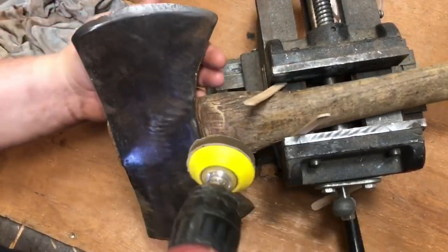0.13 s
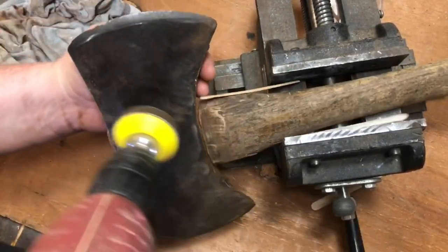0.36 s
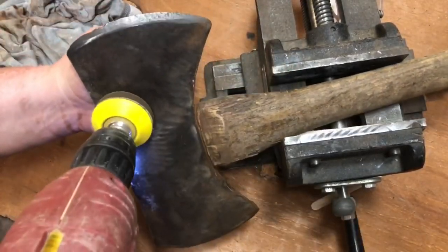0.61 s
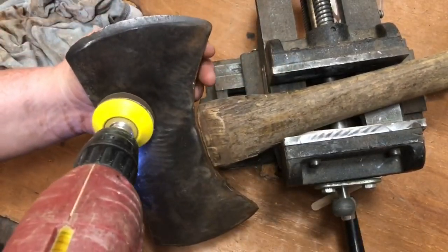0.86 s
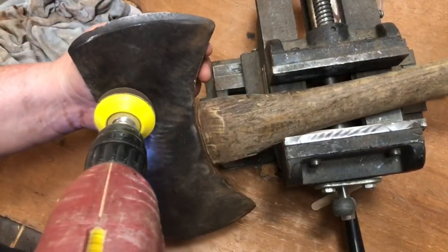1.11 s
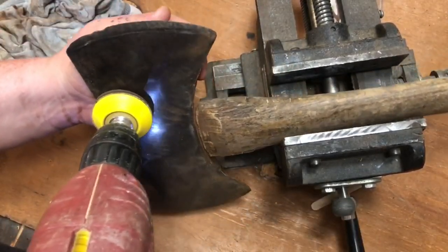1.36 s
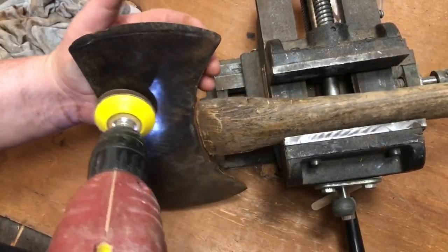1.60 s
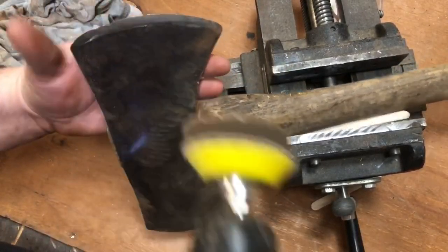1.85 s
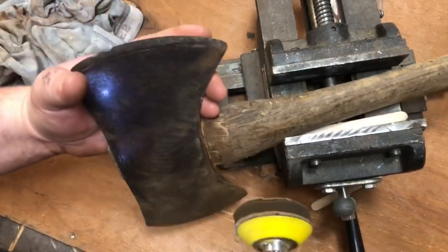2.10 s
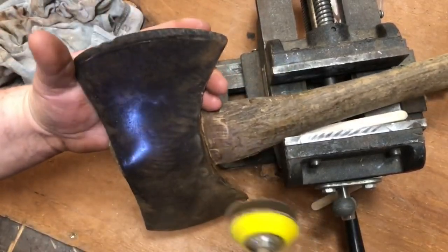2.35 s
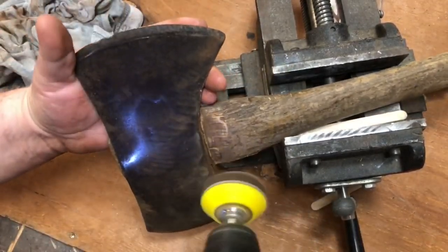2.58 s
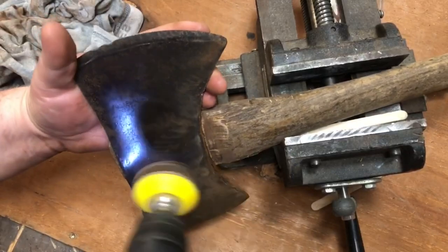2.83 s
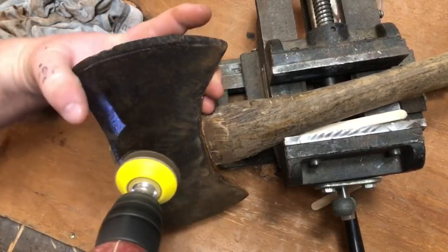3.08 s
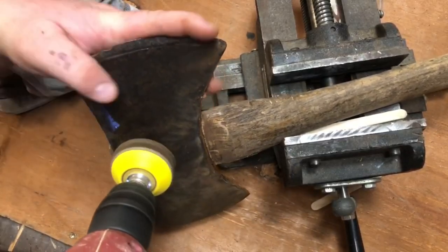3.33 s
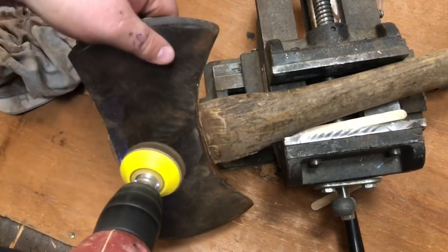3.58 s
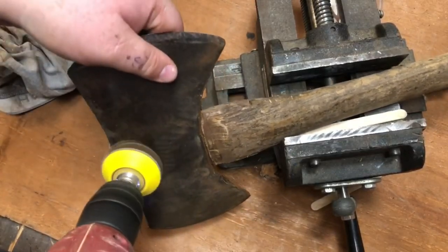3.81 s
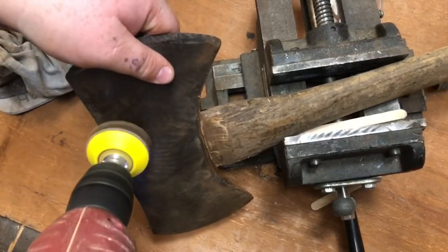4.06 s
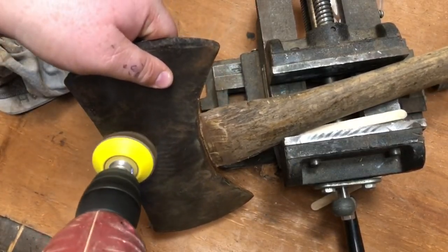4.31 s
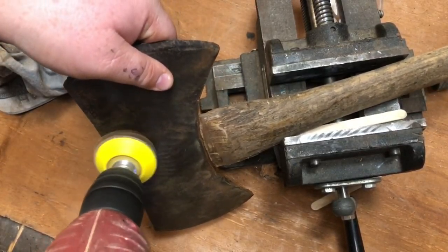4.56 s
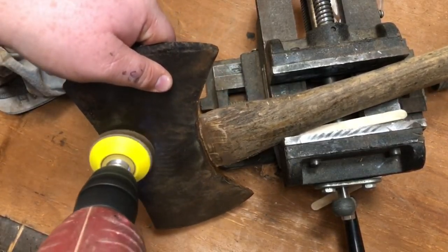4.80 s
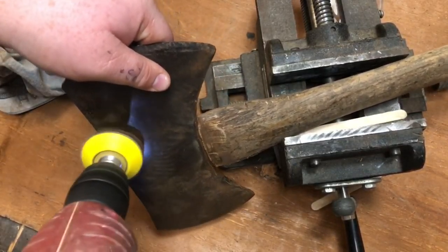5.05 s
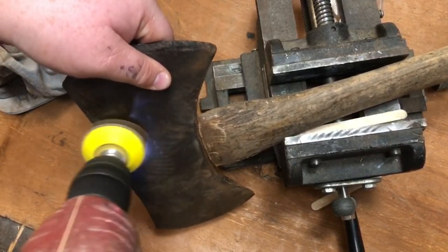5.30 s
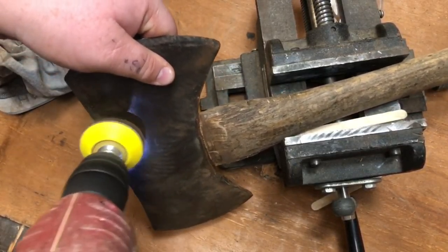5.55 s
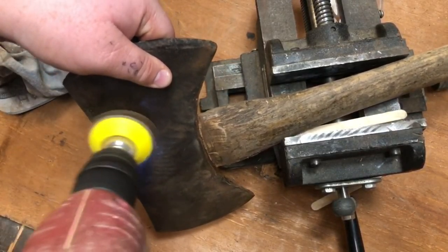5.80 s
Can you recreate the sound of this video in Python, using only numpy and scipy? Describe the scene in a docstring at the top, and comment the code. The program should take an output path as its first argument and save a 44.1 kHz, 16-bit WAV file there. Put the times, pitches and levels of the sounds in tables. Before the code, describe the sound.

Brief metallic clinks and bumps of handling an axe head, then a power drill chatters on and holds a loud, harsh, hissing whir.

```python
"""In a humming workshop, a hand drill starts up and spins a sanding disc beside a steel axe head in a vice.
Before it, hands shift the tool: steel ticks, dull knocks, scrapes, a faint chuck rattle, thuds and rustle.
Struck things are ringing modes with noise cracks; the drill is coloured noise and tones tied to rotor speed.
One close microphone, alike on both channels, hears it; its gain control ducks everything when it gets loud."""
import sys
import numpy as np
from scipy import signal
from scipy.fft import rfft, irfft
from scipy.io import wavfile

SR = 44100
rng = np.random.default_rng(int(sys.argv[2]) if len(sys.argv) > 2 else 0)


def pcm_store(signal):
    """Save signal as 16-bit PCM."""
    levels = np.round(np.clip(np.atleast_2d(signal), -1, 1) * 32767)
    wavfile.write(sys.argv[1], SR, levels.astype(np.int16).T)


def voltage_ratio(decibels):
    """Convert decibels (scalar or array-like) to amplitude ratios, 20 dB per decade."""
    exponent = np.asarray(decibels, float) / 20
    return 10 ** exponent


N = 260631
T = np.arange(N) / SR   # s

# Levels are those ahead of the gain control; colours are only shapes, brought to unit rms before use.
# room air colour: pitch_hz, level_db (per Hz)
AIR_COLOUR = [(15, -52), (25, -22), (70, -9.5), (113, -11.5), (205, 2.5), (254, -8.5), (333, -4.5),
              (380, -6.5), (460, -3), (526, -13), (854, -10), (1390, -16), (3470, -18), (11100, -43.5),
              (15700, -37)]
AIR_DB = -41.5
# machines running nearby: pitch_hz, level_db
HUM_TONES = [(118.4, -48.5), (166.9, -53), (204.6, -60), (333.8, -47), (683.7, -58), (850.6, -59)]
HUM_WIDTH_HZ, HUM_WAVER = 6.0, .35
# skin and cloth moving: start_s, level_db
RUSTLE_LEVEL = [(0.0, -62), (0.16, -55), (0.85, -57.5), (1.3, -69), (1.5, -58), (1.93, -52), (2.08, -63),
                (2.46, -55)]
# rustle colour: pitch_hz, level_db (per Hz)
RUSTLE_COLOUR = [(2000, -15), (3500, -30), (5100, 14.5), (6000, 3.5), (7300, 9.5), (10000, -0.5),
                 (16000, -12)]
ROOM_T60_S, ROOM_DB = 0.18, -24

# pushes carried through the bench: start_s, level_db, pitch_hz
BENCH_THUDS = [(0.529, -17, 403), (0.549, -28, 130), (0.567, -21.5, 230), (1.791, -18, 367),
               (1.81, -25, 375), (1.847, -18, 162), (1.864, -21, 81.4), (2.084, -17.5, 390),
               (2.11, -26, 109), (2.225, -25, 128), (2.42, -31, 75.4), (2.53, -29, 300)]
THUD_T60_CYCLES = 6.28
# wood and plastic knocks: start_s, level_db
HANDLE_KNOCKS = [(0.499, -22.5), (0.696, -31), (0.715, -36), (0.762, -28), (0.774, -26.5), (0.806, -33),
                 (1.039, -32), (1.055, -31.5), (1.647, -30.5), (2.01, -32.5), (2.068, -33), (2.079, -33.5)]
# modes of handle and housing: pitch_hz, level_db, t60_s
HANDLE_MODES = [(995, -7, 0.02), (1530, -11.5, 0.017), (2360, -11, .012), (2950, -5.5, 0.017)]
# something drags briefly over the steel: start_s, length_s, level_db
STEEL_SCRAPES = [(0.393, 0.079, -40), (0.47, 0.031, -44), (0.592, 0.066, -47), (.77, 0.094, -46),
                 (1.243, 0.055, -50), (1.578, 0.1, -51), (1.9, 0.037, -48), (2.04, 0.064, -47)]
# scrape colour: pitch_hz, level_db (per Hz)
SCRAPE_COLOUR = [(1000, -17), (3000, 7), (7500, 0), (11000, -7), (16000, -3)]
# the loose chuck tingles faintly while the drill is swung
RATTLE_FROM_S, RATTLE_TO_S, RATTLE_DB = 1.45, 1.88, -61
# chuck modes: pitch_hz, level_db, t60_s
CHUCK_MODES = [(5150, 0, .04), (6600, -1, .03), (7500, -8, .03), (9000, -9, .03), (11600, -9, .03),
               (13100, -8, .03)]
# steel touching steel: start_s, level_db, favoured pitch_hz, ring level_db (relative to the touch)
STEEL_TICKS = [(.3571, -32, 4470, -6), (.3959, -3.5, 7300, -5), (.4010, -8, 6000, -14),
               (.4105, -12, 4660, -12), (0.426, -24, 3840, -8), (.4678, -23, 5200, -7),
               (.4825, -30, 8500, -12), (0.5894, -11.5, 5900, -16), (.5940, -18, 4460, -2),
               (.6963, -31, 7500, -11), (.7617, -26, 8000, -4), (0.7742, -21, 6860, -4),
               (1.8517, -16, 5000, -12), (1.9011, -16, 6560, -7), (1.903, -10, 6250, -20),
               (2.0620, -26, 13000, -14), (2.072, -18.5, 6960, -15)]
# axe head modes: pitch_hz, level_db, t60_s
AXE_MODES = [(2500, -16, .025), (3750, -9, .06), (4400, -8, .045), (4700, -11, .06), (5200, -9, .025),
             (6100, -13, .02), (6850, -8, .035), (7400, -5, .055), (8100, -10, .025), (9200, -9, .03),
             (10450, -9, .035), (12300, -12, .025), (14000, -11, .02)]
# lighter touches, at random while the hands work
HANDLING_FROM_S, HANDLING_TO_S = .6, 2.3
FAINT_TICKS, FAINT_TICK_DB, FAINT_RING_DB = 8, -40, -11
FAINT_KNOCKS, FAINT_KNOCK_DB, FAINT_SPREAD_DB = 6, -38.5, 1

# Levels of the drill's parts are relative to each other: DRILL_GAIN_DB comes on top of them all.
DRILL_GAIN_DB = 9.5
SWITCH_ON_S, RUN_UP_S = 2.468, .075
# motor speed, runs up free and sags a little once the disc is pressed on: start_s, speed (turns per s)
ROTOR_SPEED = [(2.47, 310), (2.55, 340), (2.7, 372), (2.87, 412), (2.95, 425), (3.06, 437), (3.18, 445.3),
               (3.35, 450.8), (3.6, 454.3), (4.14, 454), (5.1, 446), (5.91, 446.5)]
# the gears take load suddenly; the hiss swells as air and disc come up to speed
ENGAGE_S, ENGAGE_RISE_S, SLACK_DB = 2.5, 0.02, -12
CLATTER_DB, FIRST_EXTRA_DB, SETTLE_S = -20.5, -0.5, 0.13
HISS_DB, HISS_LAG_DB, HISS_SWELL_S = -22, -9.5, 0.079
FADE_DB_PER_S = 0.41   # the battery tires
# gear case colour while running: pitch_hz, level_db (per Hz)
CLATTER_COLOUR = [(88, -56), (150, -49), (242, -20), (303, -22), (441, -14), (1280, -1.5), (1370, -1.5),
                  (2030, -6.5), (2860, -2), (3630, -3.5), (3950, -5), (4690, -6.5), (5380, -8.5),
                  (6070, -11), (9000, -10.5), (11700, -60), (19800, -120)]
# colour of brushes, fan and disc: pitch_hz, level_db (per Hz)
HISS_COLOUR = [(2500, -15), (4500, -2.5), (5350, 5), (6130, -2), (6900, 6), (7470, 3.5), (8300, 6),
               (9550, 6), (10900, 7.5), (12500, 5), (14000, 1), (15000, 5), (15700, 5.5), (17000, -5.5)]
# uneven teeth smear tones into bands: multiple of rotor speed, level_db, width_hz
SMEARED_TONES = [(3, -49.5, 420), (9, -31.5, 360), (12, -35, 260)]
SMEAR_GROWTH = 3   # power of speed
# a lower panel sings while the motor pulls hardest
BITE_HZ, BITE_T60_S, BITE_DB, BITE_S = 3250, .007, -19, .08
# a panel that the gears keep ringing
HOUSING_HZ, HOUSING_T60_S, HOUSING_DB = 3920, 0.019, -31
# teeth taking up their slack, first as single blows: start_s, level_db
SLACK_JOLTS = [(2.4695, -17), (2.4790, -23), (2.4880, -19), (2.5015, -13)]
# then as a quick run
CHATTER_FROM_S, CHATTER_GAP_S, CHATTER_COUNT = 2.511, .0082, 13
CHATTER_DB, CHATTER_FADE_DB_PER_S, CHATTER_SPREAD_DB = -12.5, 22, 2
# gear case colour when jolted: pitch_hz, level_db (per Hz)
JOLT_COLOUR = [(100, -50), (500, -12), (1050, -4), (1600, -1), (2200, -6.5), (3300, -7), (4500, -9.5),
               (6000, -18), (7500, -14), (11500, -24), (16000, -25)]
# what a jolt leaves ringing: pitch_hz, level_db, t60_s
JOLT_MODES = [(1040, -10.5, 0.013), (3190, -10, 0.017), (3530, -15, 0.018)]
# teeth, bars and blades passing: multiple of rotor speed, level_db
WHINE_TONES = [(2, -48), (3, -38), (12, -40), (24, -42), (32, -50), (36, -33)]
SHELL_T60_S, SHELL_DB, SHIFT_HZ = 0.09, -13.5, 3.16

# microphone
DUCK_FROM_DB, DUCK_SLOPE, DUCK_S = -32.5, 0.48, 0.12
CUTOFF_HZ, RUMBLE_CUT_HZ = 15750, 46


def rms_one(x):
    """Scale to unit rms."""
    return x / np.sqrt(np.mean(x ** 2) + 1e-20)


def in_time(rows):
    """A table of times and values, read at every sample."""
    s, value = np.transpose(rows)
    return np.interp(T, s, value)


def coloured(x, spectrum):
    """Give a white signal a spectrum in dB per Hz; rms 1."""
    hz, level_db = np.transpose(spectrum)
    grid = np.maximum(np.arange(N // 2 + 1) * SR / N, 1)
    gain = voltage_ratio(np.interp(np.log(grid), np.log(hz), level_db))
    return rms_one(irfft(rfft(x) * gain, N))


def drift(rate_hz):
    """Slow chance: noise twice through a one-pole low-pass, run in; spread 1."""
    r = np.exp(-2 * np.pi * rate_hz / SR)
    noise = rng.standard_normal(N + SR)
    return rms_one(signal.lfilter([1], [1, -2 * r, r * r], noise)[SR:])


def grains(per_s, spread_db):
    """Dense random impacts of uneven size."""
    size = voltage_ratio(spread_db * np.minimum(rng.exponential(1, N), 5)) * rng.choice([-1, 1], N)
    return size * (rng.random(N) < per_s / SR)


def ring(clicks, hz, t60):
    """A unit click sets a sine of height 1 ringing."""
    r, w = voltage_ratio(-60 / (t60 * SR)), 2 * np.pi * hz / SR
    return signal.lfilter([0, np.sin(w)], [1, -2 * r * np.cos(w), r * r], clicks + 1e-18)


def struck(times, gains_db, modes, spread_db):
    """Each blow strikes every mode with a strength and sign of its own."""
    at, out = np.round(times * SR).astype(int), np.zeros(N)
    for hz, level_db, t60 in modes:
        strength, sign = rng.standard_normal((2, len(at)))
        clicks = np.zeros(N)
        clicks[at] = voltage_ratio(gains_db(hz) + level_db + spread_db * strength) * np.sign(sign)
        out += ring(clicks, hz, t60)
    return out


def crack(times, level_db, spectrum, decay_s, rise_s=0.0004):
    """The first milliseconds of a contact: a burst of noise that swells and dies at once."""
    marks = np.zeros(N)
    marks[np.round(times * SR).astype(int)] = voltage_ratio(level_db)
    age = np.arange(SR // 8) / SR
    shape = np.exp(-age / decay_s) * (1 - np.exp(-age / rise_s))
    envelope = signal.fftconvolve(marks, shape / shape.max())[:N]
    return envelope * coloured(rng.standard_normal(N), spectrum)


def echoes(x, t60, dull):
    """A dense tail of dying noise: many close modes ringing at once; same power as x."""
    age = np.arange(SR // 2) / SR
    tail = signal.lfilter([1], [1, -dull], rng.standard_normal(len(age)) * voltage_ratio(-60 * age / t60))
    return signal.fftconvolve(x, tail / np.sqrt(np.sum(tail ** 2)))[:N]


def faint(count, level_db):
    """Times, levels and one spare chance for light touches scattered over the handling."""
    when, size, spare = rng.random((count, 3)).T
    s = HANDLING_FROM_S + when * (HANDLING_TO_S - HANDLING_FROM_S)
    return s, level_db + FAINT_SPREAD_DB * (2 * size - 1), spare


def room_air():
    """Steady room noise whose level drifts slightly."""
    return voltage_ratio(AIR_DB + .6 * drift(4)) * coloured(rng.standard_normal(N), AIR_COLOUR)


def hum():
    """Machine tones, each wavering in level and phase."""
    out = np.zeros(N)
    for hz, level_db in HUM_TONES:
        waver = 1 + HUM_WAVER * (drift(HUM_WIDTH_HZ) + 1j * drift(HUM_WIDTH_HZ))
        out += voltage_ratio(level_db) * np.real(waver * np.exp(2j * np.pi * hz * T))
    return out


def rustle():
    """Skin and cloth: many small impacts under a changing level."""
    level = voltage_ratio(in_time(RUSTLE_LEVEL) + 0.4 * drift(32))
    return level * coloured(grains(4000, spread_db=2.0), RUSTLE_COLOUR)


def room(x):
    """Early walls: a short, duller tail."""
    return voltage_ratio(ROOM_DB) * echoes(x, ROOM_T60_S, dull=0.13)


def thuds():
    """Soft pushes, each ringing a few cycles at its own pitch over a rough rumble."""
    out = np.zeros(N)
    for s, level_db, hz in BENCH_THUDS:
        age = np.arange(SR // 5) / SR * hz   # in cycles
        at = round(s * SR)
        swell = 1 - np.exp(-3.0 * age)
        out[at:at + len(age)] += voltage_ratio(level_db - 60 * age / THUD_T60_CYCLES) * np.sin(2 * np.pi * age) * swell
    s, level_db, hz = np.transpose(BENCH_THUDS)
    rumble_colour = [(40, -38), (120, 5.0), (450, -2), (900, -14), (3000, -60)]   # pitch_hz, level_db
    return out + crack(s, level_db - 18.5, rumble_colour, 0.034)


def knocks():
    """Short dull rings of the wooden handle and plastic housing, each with a noise burst."""
    s, level_db = np.hstack([np.transpose(HANDLE_KNOCKS), faint(FAINT_KNOCKS, FAINT_KNOCK_DB)[:2]])
    rings = struck(s, lambda hz: level_db + 0.5, HANDLE_MODES, spread_db=4.0)
    colour = [(400, -18), (1000, -0.5), (3300, -3), (4500, -8.5), (12000, -27)]   # pitch_hz, level_db
    return rings + crack(s, level_db - 4.5, colour, 0.0035, rise_s=0.0011)


def scrapes():
    """Gritty drags over the steel, swelling and fading."""
    pressure = np.zeros(N)
    for s, length_s, level_db in STEEL_SCRAPES:
        pressure += voltage_ratio(level_db) * np.sin(np.pi * np.clip((T - s) / length_s, 0, 1))
    return pressure * coloured(grains(8000, spread_db=2.0), SCRAPE_COLOUR)


def rattle():
    """Tiny dense touches keep the chuck's modes alive."""
    along = np.clip((T - RATTLE_FROM_S) / (RATTLE_TO_S - RATTLE_FROM_S), 0, 1)
    swing = np.sqrt(np.abs(np.sin(np.pi * along))) * (along < 1)
    touches = swing * grains(400, spread_db=2.0)
    return voltage_ratio(RATTLE_DB) * sum(voltage_ratio(level_db) * ring(touches, hz, t60) for hz, level_db, t60 in CHUCK_MODES)


def ticks():
    """A short crack, then the steel modes nearest the pitch that the contact favours."""
    s, level_db, spare = faint(FAINT_TICKS, FAINT_TICK_DB)
    light = np.transpose([s, level_db, 6000 * 2 ** spare, np.full_like(s, FAINT_RING_DB)])
    s, level_db, centre_hz, ring_db = np.vstack([STEEL_TICKS, light]).T

    def mode_gains_db(hz):
        return level_db + ring_db - 15 * np.abs(np.log2(hz / centre_hz))   # 15 dB less per octave away

    modes = struck(s, mode_gains_db, AXE_MODES, spread_db=3.0)
    cracks = np.zeros(N)
    age = np.arange(SR // 50) / SR
    for at, tick_db, hz in zip(np.round(s * SR).astype(int), level_db, centre_hz):
        burst = rng.standard_normal(len(age)) * np.exp(-age / 0.0014)
        band = signal.butter(2, [hz / 1.7, min(hz * 1.6, .45 * SR)], "band", fs=SR)
        cracks[at:at + len(age)] += voltage_ratio(tick_db - 5) * signal.lfilter(*band, burst)
    return modes + cracks


def rotor():
    """Rotor angle in radians, slightly unsteady, and speed as a share of its highest."""
    turns_per_s = in_time(ROTOR_SPEED)
    angle = 2 * np.pi * np.cumsum(turns_per_s * (1 + .0005 * drift(15))) / SR
    return angle, turns_per_s / np.max(ROTOR_SPEED)


def clatter(since):
    """Gear teeth: dense impacts through the case, loaded suddenly and then settling."""
    loaded = np.maximum(since, 0)
    slack_db = SLACK_DB * np.clip(1 - since / ENGAGE_RISE_S, 0, 1)
    first_db = FIRST_EXTRA_DB * np.exp(-loaded / SETTLE_S)
    level_db = CLATTER_DB + slack_db + first_db - FADE_DB_PER_S * loaded
    return coloured(grains(16000, spread_db=1.0), CLATTER_COLOUR) * voltage_ratio(level_db + 1.2 * drift(45))


def hiss(loaded):
    """Brushes, fan and disc: dense uneven impacts swelling towards full level."""
    level_db = HISS_DB + HISS_LAG_DB * np.exp(-loaded / HISS_SWELL_S) - FADE_DB_PER_S * loaded
    return coloured(grains(24000, spread_db=3.5), HISS_COLOUR) * voltage_ratio(level_db + 0.81 * drift(49))


def smears(angle, speed):
    """Bands of noise riding on multiples of the rotor speed, growing with it."""
    bands = np.zeros(N)
    for multiple, level_db, width_hz in SMEARED_TONES:
        smear = drift(width_hz) + 1j * drift(width_hz)
        bands += voltage_ratio(level_db) * np.real(smear * np.exp(1j * multiple * angle))
    return bands * speed ** SMEAR_GROWTH


def bite(loaded):
    """A low panel rung by random impacts, dying away after the gears engage."""
    panel = rms_one(ring(grains(3000, spread_db=-0.5), BITE_HZ, BITE_T60_S))
    return voltage_ratio(BITE_DB) * np.exp(-loaded / BITE_S) * panel


def housing(speed):
    """A panel kept ringing by noise, growing steeply with speed."""
    return voltage_ratio(HOUSING_DB) * rms_one(ring(rng.standard_normal(N), HOUSING_HZ, HOUSING_T60_S)) * speed ** 4


def jolts():
    """Slack taken up in single blows, then a slightly uneven, fading run: cracks and rings."""
    s, level_db = np.transpose(SLACK_JOLTS)
    late, size = rng.standard_normal((2, CHATTER_COUNT))
    age = CHATTER_GAP_S * (np.arange(CHATTER_COUNT) + .08 * late)
    run_db = CHATTER_DB - CHATTER_FADE_DB_PER_S * age + CHATTER_SPREAD_DB * size
    s, level_db = np.append(s, CHATTER_FROM_S + age), np.append(level_db, run_db)
    cracks = crack(s, level_db - 9.5, JOLT_COLOUR, 0.0024, rise_s=0.00077)
    return cracks + struck(s, lambda hz: level_db, JOLT_MODES, spread_db=2.5)


def whine(angle, speed):
    """Tones at multiples of the rotor speed, wavering in level and growing steeply with speed."""
    tones = np.zeros(N)
    for multiple, level_db in WHINE_TONES:
        tones += np.sqrt(2) * voltage_ratio(level_db + 2.5 * drift(8)) * np.cos(multiple * angle)
    return tones * speed ** 5


def drill():
    """Noises and whine fade in as the motor runs up; near echoes comb the noises."""
    since = T - ENGAGE_S
    loaded = np.maximum(since, 0)
    running = np.clip((T - SWITCH_ON_S) / RUN_UP_S, 0, 1) ** 1.5
    angle, speed = rotor()
    steady = clatter(since) + hiss(loaded) + smears(angle, speed) + bite(loaded) + housing(speed)
    noise = running * steady + jolts()
    # echoes off steel and bench comb the noise; the comb shifts as the tool moves
    near = sum(drift(SHIFT_HZ) * echoes(noise, SHELL_T60_S, dull=0) for _ in range(4)) / 2
    return voltage_ratio(DRILL_GAIN_DB) * (noise + voltage_ratio(SHELL_DB) * near + running * whine(angle, speed))


def scene():
    """Everything at the close microphone, alike on both channels."""
    workshop = room_air() + hum() + rustle()
    handling = thuds() + knocks() + scrapes() + rattle() + ticks()
    return np.tile(workshop + handling + room(handling) + drill(), (2, 1))


def band_limit(x):
    """A steep low-pass at the top of the band."""
    return signal.sosfilt(signal.butter(12, 16390, fs=SR, output="sos"), x)


def record(dry):
    """The microphone's gain control follows the level; top and bottom are cut."""
    r = np.exp(-1 / (DUCK_S * SR))
    power = signal.lfilter([1 - r], [1, -r], dry[0] ** 2)
    over_db = np.clip(10 * np.log10(power + 1e-12) - DUCK_FROM_DB, 0, 16)
    ducked = dry * voltage_ratio(-DUCK_SLOPE * over_db)
    topped = signal.sosfilt(signal.ellip(14, .3, 60, CUTOFF_HZ, fs=SR, output="sos"), ducked)
    mix = signal.sosfilt(signal.butter(2, RUMBLE_CUT_HZ, "high", fs=SR, output="sos"), topped)
    return band_limit(mix)


dry = scene()
out = record(dry)
pcm_store(out)
```